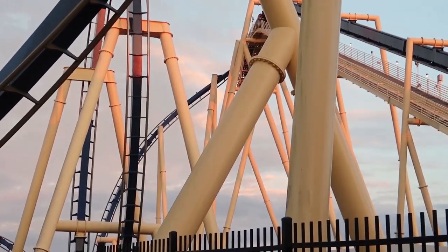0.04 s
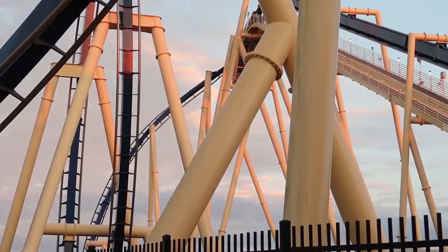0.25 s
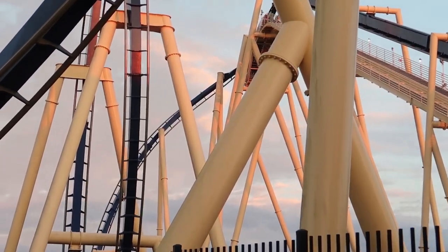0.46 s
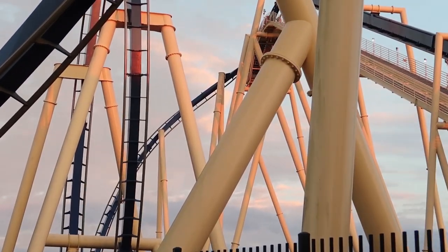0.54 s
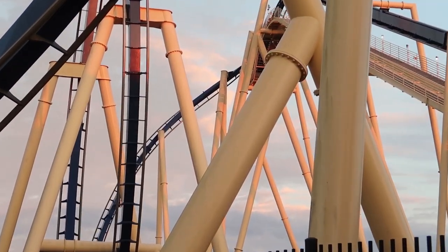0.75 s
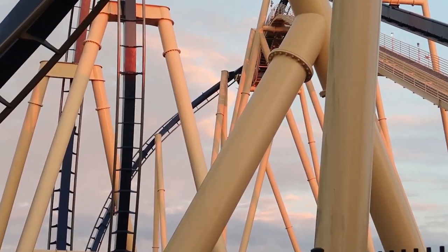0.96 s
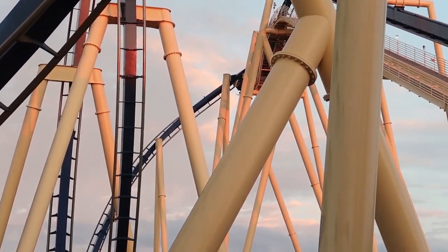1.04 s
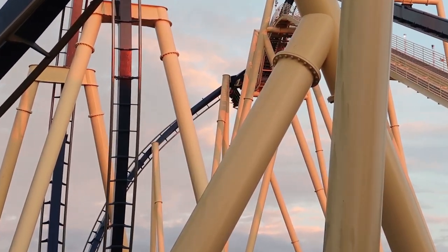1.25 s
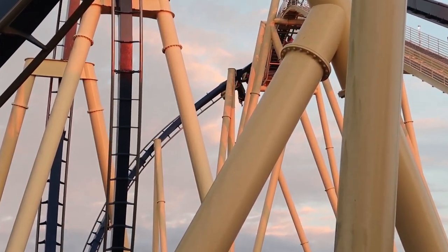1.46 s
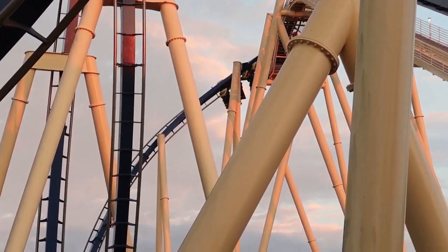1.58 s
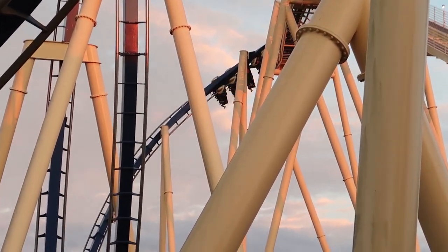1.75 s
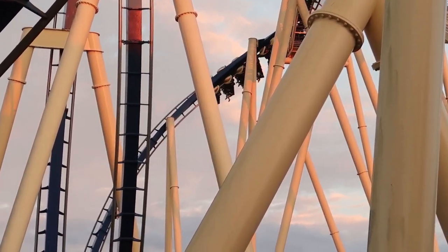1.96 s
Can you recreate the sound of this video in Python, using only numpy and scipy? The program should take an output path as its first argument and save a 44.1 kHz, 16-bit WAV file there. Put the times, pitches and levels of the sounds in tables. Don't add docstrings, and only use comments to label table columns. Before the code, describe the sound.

A steel coaster train rumbles along its track outdoors; a sharp rattling clack comes almost at once, another over a second later, after which the roar drops quieter. Phone microphone outside a fence, slight low wind.

```python
import sys
import numpy as np
from scipy import signal
from scipy.fft import rfft, irfft
from scipy.io import wavfile
from scipy.ndimage import uniform_filter1d

SR = 44100
rng = np.random.default_rng(int(sys.argv[2]) if len(sys.argv) > 2 else 0)


def elevation(decibels):
    levels = np.asarray(decibels, float)
    return 10 ** (levels / 20)


def pcm_store(signal):
    levels = np.round(np.clip(np.atleast_2d(signal), -1, 1) * 32767)
    wavfile.write(sys.argv[1], SR, levels.astype(np.int16).T)


N = 89082
T = np.arange(N) / SR
HZ = np.maximum(np.fft.rfftfreq(N, 1 / SR), 1)


def curve(table, column):
    rows = np.array(table)
    return np.interp(T, rows[:, 0], rows[:, column])


def over_hz(table, hz):
    rows = np.array(table)
    return np.interp(np.log(hz), np.log(rows[:, 0]), rows[:, 1])


def unit(x):
    return x / np.sqrt(np.mean(x ** 2))


def noise():
    return rng.standard_normal(N)


def shaped_noise(table):
    return unit(irfft(rfft(noise()) * elevation(over_hz(table, HZ)), N))


def ring(x, peaks):
    out = 0
    for k, (hz, width_hz, db) in enumerate(peaks):
        b, a = signal.iirpeak(hz, hz / width_hz, SR)
        out = out + (-1) ** k * elevation(db) * signal.lfilter(b, a, x)
    return out


def walk(rate_hz):
    k = int(SR / rate_hz)
    held = rng.standard_normal(256)[np.arange(N) // k]
    return 1.34 * uniform_filter1d(uniform_filter1d(held, k), k)


def grit(rate_per_s, spread_db):
    size = noise() * elevation(spread_db * rng.exponential(size=N))
    return unit(size * (rng.random(N) < rate_per_s / SR))


def strike(start_s, attack_s, t60_s):
    u = np.maximum(T - start_s, 0)
    return (1 - np.exp(-3 * u / max(attack_s, 1e-4))) * elevation(-60 * u / max(t60_s, 1e-3))


def gliding_sine(table):
    return np.sin(2 * np.pi * np.cumsum(curve(table, 1)) / SR)


# (frequency [Hz], side minus mid [dB])
PORT_SIDE = [(60, -49), (200, -44), (380, -22), (700, -19.5), (1290, -10), (2380, -6), (4400, 2),
             (8120, 13), (15000, 23.5)]


def ports(x, side, left_db=0):
    lead = side * np.arctan(elevation(over_hz(PORT_SIDE, HZ)))
    lead = lead - 1j * left_db * np.log(10) / 40
    return irfft(rfft(x) * np.exp(1j * np.array([lead, -lead])), N)


# (time [s], heard level [dB], wind gust [dB], brightness [dB per octave])
TRAIN = [(0.0, -15, -4.5, -0.5), (0.04, -20, -3, 1.5), (0.11, -18, -9.5, 0), (0.23, -26, -6, 2.5),
         (0.33, -23.5, -17, 0.5), (1.05, -19, -24, 0), (1.12, -17.5, -35, 0), (1.2, -17.5, -37, 0),
         (1.36, -17.5, -36, 1.5), (1.39, -27, -62, 1.5), (1.64, -29.5, -12, 0), (1.67, -27, -32, 0.3),
         (1.84, -27.5, -52, 0.6), (1.86, -25.5, -64, 0.3), (1.9, -26.5, -41, 0.3), (2.02, -27.5, -65, 0.7)]
# (frequency [Hz], level [dB per Hz])
WIND_SPECTRUM = [(15, -39), (35, -23.5), (60, -10.5), (100, -10), (160, -9.5), (400, -110)]


def wind():
    level_db, apart_db = -1, -27
    mid, side = shaped_noise(WIND_SPECTRUM), shaped_noise(WIND_SPECTRUM)
    both = mid + elevation(apart_db) * side * np.array([[1], [-1]])
    return both * elevation(level_db + curve(TRAIN, 2) + 2.5 * walk(15))


# (frequency [Hz], level [dB per Hz])
RUMBLE_SPECTRUM = [(60, -7.5), (200, 2), (420, 1), (850, -3.5), (1500, -11.5), (1800, -14.5), (5000, -25),
                   (12500, -47.5)]
# (frequency [Hz], width [Hz], level [dB])
STEEL = [(200, 30, -10), (360, 30, -9), (450, 30, -8), (710, 50, -8), (790, 40, -9), (950, 30, -11),
         (1330, 50, -15), (1400, 40, -17), (2450, 120, -23), (2910, 60, -32), (5300, 400, -35),
         (8300, 500, -36), (10000, 500, -41)]
# (time [s], slope under 300 Hz [dB per octave])
BOOM = [(1.36, -2), (1.42, -2), (1.75, -2.5), (1.85, -5), (2.02, -6)]


def rumble():
    steel_db, knock_db = 6.5, -4
    swell, tilt, boom = walk(5.27), curve(TRAIN, 3), curve(BOOM, 1)
    drive = noise()
    knocks = elevation(knock_db) * grit(rate_per_s=1400, spread_db=3.5)
    roar = 0
    for hz in 45 * 2 ** (np.arange(25) / 3):
        sos = signal.butter(2, [hz / 1.12, hz * 1.12], "band", fs=SR, output="sos")
        band = signal.sosfilt(sos, noise() + knocks)
        level_db = over_hz(RUMBLE_SPECTRUM, hz) + tilt * np.log2(hz / 500)
        level_db = level_db + boom * max(np.log2(300 / hz), 0)
        roar = roar + band * elevation(level_db + 0.43 * swell + 1.1 * walk(11.9))
    steel = 0
    for hz, width_hz, db in STEEL:
        tone = ring(ring(drive, [(hz, width_hz, 0)]), [(hz, width_hz, db)])
        steel = steel + tone * elevation(5.0 * walk(8) + tilt * np.log2(hz / 500))
    return unit(roar + elevation(steel_db) * steel)


# (time [s], frequency [Hz], level [dB])
WHINE = [(1.56, 4200, -43), (1.59, 4210, -20), (1.62, 4160, -30), (1.645, 4230, -36), (1.67, 4190, -24),
         (1.73, 4210, -22), (1.77, 4080, -23), (1.8, 4200, -26.5), (1.87, 4170, -20.5), (1.9, 4140, -56)]
# (time [s], frequency [Hz], level re the rumble [dB])
SING = [
    (.3, 1580, -30),
    (.75, 1590, -27),
    (.85, 1600, -19),
    (1.2, 1596, -15),
    (1.3, 1586, -12.5),
    (1.42, 1590, -46),
]


def tones():
    out = 0
    for tone in (WHINE, SING):
        hz = curve(tone, 1) + 15 * walk(30)
        level = elevation(curve(tone, 2) + 3.4 * walk(24.9))
        out = out + np.sin(2 * np.pi * np.cumsum(hz) / SR) * level
    return out


# (time [s], level re the rumble [dB])
TICKS = [
    (0.329, -13.5),
    (.575, -13.5),
    (.76, -27),
    (0.904, -13),
    (1.046, -16),
    (1.189, -12.5),
    (1.735, -21),
    (1.995, -17),
]
# (frequency [Hz], width [Hz], level [dB])
DOG = [(3000, 900, -9), (5200, 600, 0), (6800, 900, -6), (10000, 900, -10)]


def ticks():
    env = sum(elevation(db) * strike(s, 0.0023, t60_s=0.32) for s, db in TICKS)
    return ports(unit(ring(noise(), DOG)) * env, -0.95)


# (time [s], frequency [Hz], peak level [dB])
GROAN = [
    (1.08, 192, -52),
    (1.125, 209.6, -17),
    (1.155, 244, -19),
    (1.2, 243, -25),
    (1.24, 232, -45),
]


def groan():
    level = elevation(curve(GROAN, 2) + 3.4 * walk(62.2))
    return gliding_sine(GROAN) * level * (T > GROAN[0][0]) * (T < GROAN[-1][0])


# (time [s], peak [dB], t60 [s], push strength, negative = pull)
THUMPS = [(.014, -18, 0.039, 0.5), (.053, -12, 0.021, 1), (0.075, -9, 0.024, 1.5),
          (0.105, -21.5, 0.029, -3.5), (0.116, -13.5, 0.21, 1), (0.1233, -21.5, .05, -2.5),
          (.68, -21, 0.049, 1.5), (.76, -22, 0.017, 1.5), (1.127, -16, .03, -1), (1.151, -27, 0.027, 0.5),
          (1.267, -19.5, 0.075, -1.5), (1.343, -16.5, 0.037, 3), (1.938, -28, .03, 2),
          (1.968, -24, 0.025, 2.5), (2.001, -33, 0.1, -2.5)]
# (frequency [Hz], width [Hz], level [dB])
JOINT = [(158, 74, 3), (399, 76, 6.5), (720, 330, -3.5)]


def thumps():
    blow_s, blow_db = 0.00059, 1
    env, push = 0, 0
    for s, db, t60_s, way in THUMPS:
        env = env + elevation(db) * strike(s, 0.0018, t60_s)
        u2 = ((T - s) / blow_s - 2) ** 2
        push = push + way * elevation(db + blow_db) * (1 - u2) * np.exp(-0.5 * u2)
    return push + unit(ring(noise(), JOINT)) * env


# (time [s], frequency [Hz], width [Hz], peak [dB], t60 [s])
PINGS = [(0.019, 720, 49, -19.5, 0.42), (0.17, 891, 29.7, -21, 0.45), (.12, 1307, 50.4, -25, 0.22),
         (.585, 359, 35.5, -20, 0.22), (.752, 394, 50, -20, 0.11), (1.262, 523, 40, -15, 0.25),
         (1.316, 1320, 121, -14, 0.17), (1.365, 2040, 154, -11.5, 0.074), (1.94, 1370, 60, -30.5, 0.29),
         (1.998, 764, 119, -19, 0.071), (.108, 388, 40, -18, 0.31), (.2, 2407, 130, -26, 0.32),
         (.24, 369, 50, -25.5, 0.34), (1.17, 258, 40.4, -21.5, 0.45), (1.377, 2490, 200, -22.5, .12)]
# (time [s], frequency [Hz], width [Hz], peak [dB], t60 [s])
SIZZLES = [(.115, 12400, 500, -39, 0.53), (.1, 13500, 400, -52, .3), (.1, 14600, 500, -46, .35),
           (.146, 12600, 500, -31, .12), (.147, 7950, 400, -32.5, 0.091), (1.165, 10400, 500, -52, 0.12),
           (1.21, 10200, 400, -50, .4), (1.324, 13700, 500, -24, 0.031), (1.385, 11300, 400, -37.5, 0.18),
           (1.67, 10100, 400, -66, 0.31), (1.735, 9900, 795, -57, .25), (1.735, 11700, 500, -60, 0.24)]


def pings(table):
    out = 0
    for s, hz, width_hz, db, t60_s in table:
        narrow = ring(noise(), [(hz, width_hz, 0)])
        tone = unit(ring(narrow, [(hz, 2 * width_hz, 0)]))
        out = out + tone * elevation(db) * strike(s, 0.0028, t60_s)
    return out


# (time [s], peak [dB], t60 [s], brightness [dB], body [dB])
CLACKS = [(0.104, -38, 0.092, -2.5, -10), (0.11, -23, 0.17, 3, 0), (0.117, -18.5, 0.14, -9, -12),
          (.131, -18.5, 0.16, -12, -8), (0.147, -16.5, 0.15, 2, -2), (0.158, -14, 0.097, 3.5, -4),
          (0.173, -14, 0.11, 0, -9), (0.18, -21, 0.1, 4.5, -5), (0.204, -21, 0.1, -6, -4.5),
          (0.213, -20, 0.06, 6.5, -7), (0.237, -32.5, 0.34, 1.5, -10), (1.31, -26, 0.092, 6.5, 1),
          (1.317, -15, 0.048, 8, -3.5), (1.324, -14.5, 0.039, 3.5, -1), (1.338, -21, 0.11, -22, 6.5),
          (1.364, -15.5, 0.064, 6.5, -10), (1.367, -12.5, 0.073, 0, -13), (1.381, -20, 0.13, 3, -3),
          (1.407, -28, 0.21, 2, -4), (1.426, -42, 0.07, 4, -5.5)]
# (frequency [Hz], width [Hz], level [dB])
PLATE = [(2130, 74, -2.5), (2522, 125, 3.5), (2920, 123, -3.5), (3470, 670, -11.5), (3820, 190, -5),
         (4400, 480, -11)]
# (frequency [Hz], width [Hz], level [dB])
LOOSE = [(5270, 520, -3), (6000, 1030, -7), (7800, 630, -1), (8900, 700, -5), (10040, 600, -5.5),
         (11700, 800, -8.5), (13000, 600, -14)]
# (frequency [Hz], width [Hz], level [dB])
BODY = [(914, 78, -11), (1320, 133, 1.5), (1983, 270, -2)]
# (frequency [Hz], left minus right [dB])
CLACK_LEFT = [(300, 32), (1290, 6), (2380, 5), (4400, 2), (6500, 0.5), (11000, -0.5)]


def clacks():
    level_db, attack_s = -1, 0.0039
    tail_db, tail_t60_s, tail_top_hz = -22.5, 0.56, 5970
    rows = np.array(CLACKS)
    bright_db, body_db = rows[:, 3], rows[:, 4]
    shapes = np.array([elevation(db) * strike(s, attack_s, t60_s) for s, db, t60_s in rows[:, :3]])
    drive = grit(rate_per_s=18000, spread_db=-0.5)
    near = 0
    for part, part_db in [(PLATE, 0 * bright_db), (LOOSE, bright_db), (BODY, body_db)]:
        env = np.sqrt(elevation(2 * part_db) @ shapes ** 2)
        near = near + unit(ring(drive, part)) * env
    near = elevation(level_db) * near
    b, a = signal.butter(1, tail_top_hz, fs=SR)
    tail = signal.lfilter(b, a, noise()) * strike(0.0018, 0.0032, tail_t60_s)
    scattered = elevation(tail_db) * signal.fftconvolve(near, tail / np.linalg.norm(tail))[:N]
    left_db = over_hz(CLACK_LEFT, HZ)
    first = T < 0.7
    out = ports(near * first, 1.096, left_db) + ports(near * ~first, 0.93, left_db)
    return out + ports(scattered, -0.58)


def scene():
    train = elevation(-2.5) * ports(rumble(), -0.96) + elevation(-3.0) * ports(rumble(), 1.0)
    train = train + ticks() + tones() + wind()
    structure = ports(thumps() + groan() + pings(PINGS), 0.82)
    return train * elevation(curve(TRAIN, 1)) + structure + ports(pings(SIZZLES), 0.57) + clacks()


def low_pass(x):
    return signal.sosfilt(signal.butter(12, 15700, fs=SR, output="sos"), x)


def record(dry):
    clip, mic_top_hz = 0.94, 14400
    rounded = clip * np.tanh(dry / clip)
    mix = signal.sosfilt(signal.butter(8, mic_top_hz, fs=SR, output="sos"), rounded)
    return low_pass(mix)


dry = scene()
out = record(dry)
pcm_store(out)
```